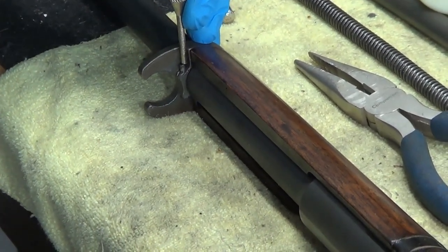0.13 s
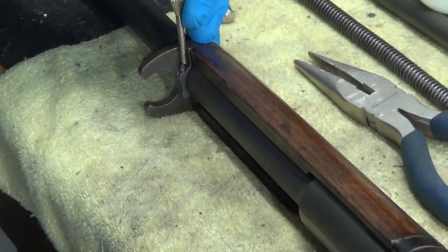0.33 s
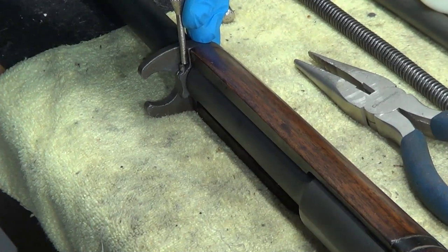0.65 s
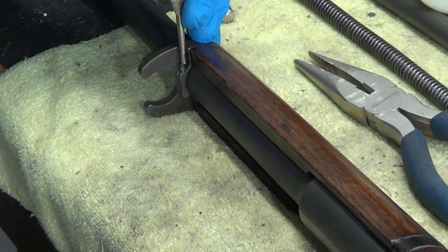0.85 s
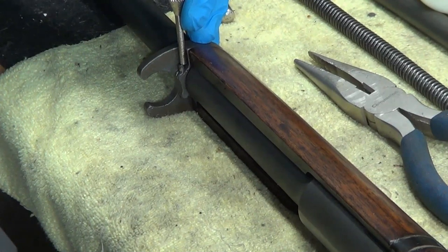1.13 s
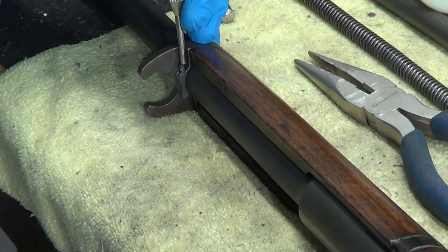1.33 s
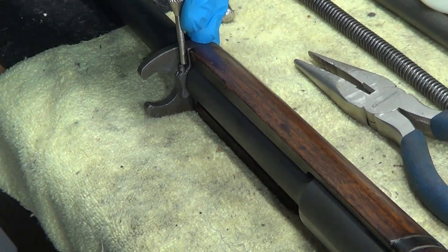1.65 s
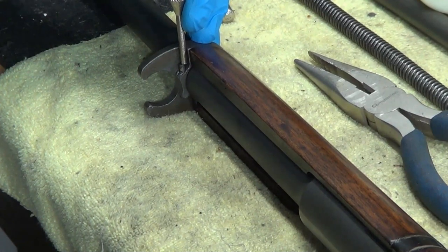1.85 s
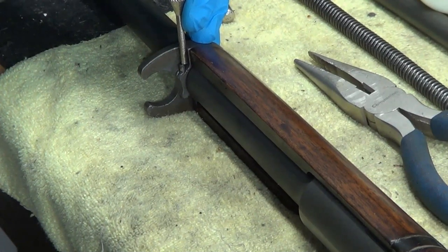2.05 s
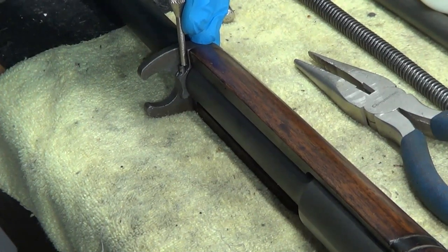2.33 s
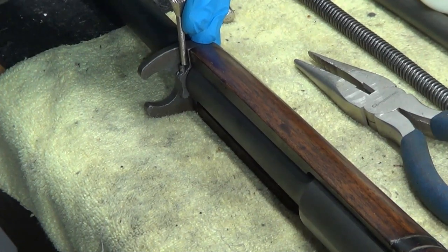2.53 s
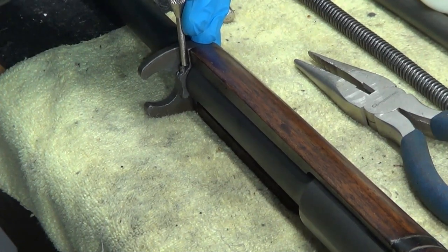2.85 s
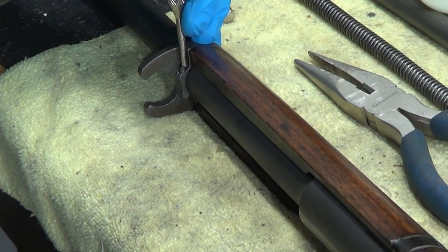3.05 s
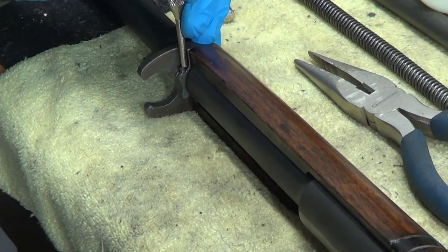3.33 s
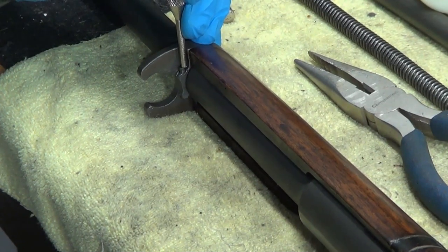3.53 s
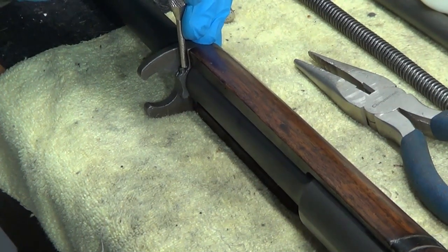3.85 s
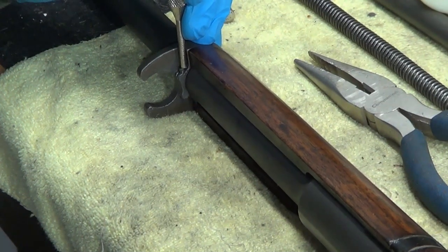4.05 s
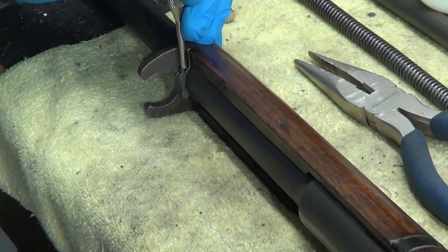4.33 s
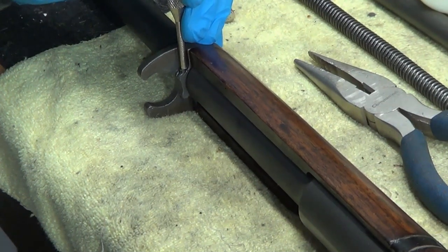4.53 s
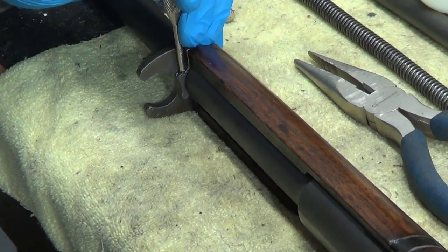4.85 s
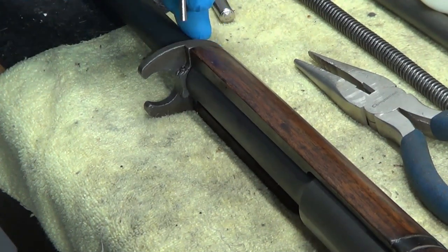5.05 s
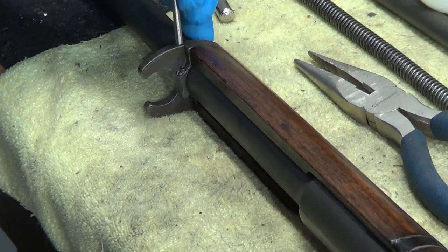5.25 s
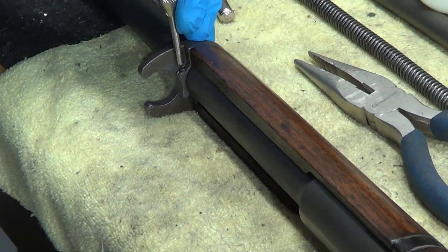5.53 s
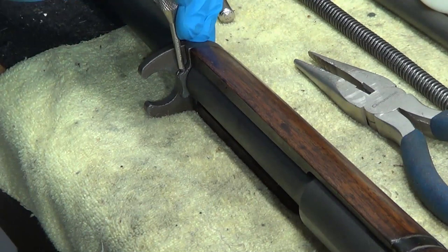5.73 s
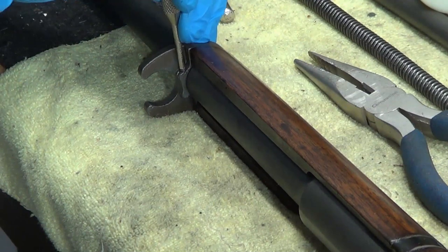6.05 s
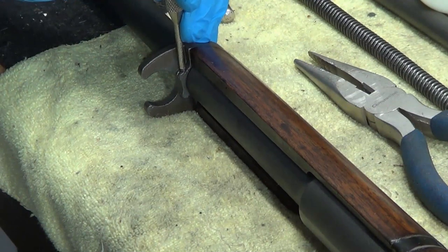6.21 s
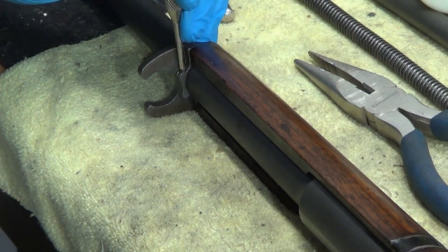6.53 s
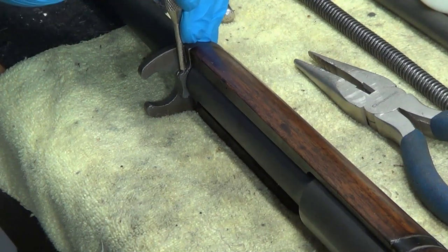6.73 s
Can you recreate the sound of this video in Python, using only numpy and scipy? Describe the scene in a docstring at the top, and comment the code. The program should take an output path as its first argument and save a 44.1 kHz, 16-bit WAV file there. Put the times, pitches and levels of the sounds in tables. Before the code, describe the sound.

Light metal hammer taps on a punch ring briefly against a gun on a workbench, with tiny scrapes between runs and a soft fan.

```python
"""A small hammer taps a steel pin punch into a wood-and-steel gun action lying on a workbench.
Each impact excites normal modes: heavily damped ones in hammer and punch make the crack, lightly damped
ones in action and bench ring on, and the small workshop reverberates. Between the runs of taps the punch
is re-seated, and friction makes short scrapes and squeaks. A fan hums throughout, a fast limiter
flattens each blow, and a thin electrical whine sits on top."""
import sys
import numpy as np
from scipy import signal
from scipy.fft import rfft, irfft
from scipy.io import wavfile
from scipy.ndimage import uniform_filter1d

SR = 44100
rng = np.random.default_rng(int(sys.argv[2]) if len(sys.argv) > 2 else 0)


def wrap_up_sound(samples):
    """Save the sound to the file named by the first command line argument, as 16-bit audio."""
    columns = np.atleast_2d(samples).T
    # keep every value between -1 and 1, then stretch to whole-number steps
    tamed = np.clip(columns, -1, 1)
    steps = np.round(tamed * 32767).astype(np.int16)
    wavfile.write(sys.argv[1], SR, steps)


N = 303408
TIME = np.arange(N) / SR
AGE = np.arange(2 ** 15) / SR  # seconds since a contact
HZ = np.fft.rfftfreq(len(AGE), 1 / SR)  # frequency axis of one contact's spectrum

# normal modes of bench, stock and action: frequency_hz, level_db, t60_s
WORK_MODES = [(156, -20.5, 0.33), (182.4, -16, 0.24), (430.4, -25, 0.68), (458, -32, 0.83),
              (742.6, -20.5, 0.6), (806.5, -23, 0.36), (1050, -26, 0.37), (1169.5, -15, 0.3),
              (1188, -13, 0.25), (1349, -21.5, 0.43), (1370, -18, 0.54), (1386, -17, 0.31),
              (1684, -18.5, 0.17), (1685, -23, 0.25), (1750, -18, 0.16), (1793, -20, 0.3),
              (1887, -16.5, 0.16), (1929, -17, 0.28), (1956, -25.5, 0.37), (1990, -22, 0.24),
              (2537, -18, 0.24), (2594, -16.5, 0.27), (2760, -33, 0.25), (2850, -25.5, 0.24),
              (2870, -23.5, 0.31), (3800, -29, 0.3), (3750, -16.5, 0.22), (3790, -20, 0.24),
              (7100, -25, 0.32), (8660, -12.5, 0.17)]


def from_db(db):
    """Amplitude ratio of a level: a factor of ten for every 20 dB."""
    return 10 ** (np.asarray(db) / 20)


def at_hz(points, hz):
    """Interpolation of (frequency, value) points on a logarithmic frequency axis."""
    point_hz, values = np.transpose(points)
    return np.interp(np.log(hz + 1), np.log(point_hz), values)


def decay(age, t60):
    """Exponential damping from age zero: the level falls 60 dB in t60 seconds."""
    return (age >= 0) * np.exp(-np.log(1000) * np.maximum(age, 0) / t60)


def add(out, start_s, sound):
    """Superposition: a sound adds linearly to the mix from its start time."""
    at = round(start_s * SR) + np.arange(len(sound))
    inside = (at >= 0) & (at < N)
    out[at[inside]] += sound[inside]


def shaped(white, shape_db):
    """Spectral shaping: the spectrum of white noise, filtered with unit mean power gain."""
    gain = from_db(shape_db)
    return rfft(white) * gain / np.sqrt(np.mean(gain ** 2))


def resonance(centre_hz, width_hz, height_db):
    """Frequency response of a resonance, as a bell curve in decibels."""
    return from_db(height_db * np.exp(-.5 * ((HZ - centre_hz) / width_hz) ** 2))


def struck(modes, phases, scatter_db=2.4, build_cycles=1.0, detune=0.0011):
    """Modal synthesis: damped sinusoids, newly weighted at each impact; low ones build up slowest."""
    hz, level_db, t60 = np.array(modes).T[:, :, None]
    strength, shift = rng.standard_normal((2, len(hz), 1))
    amplitude = np.sqrt(2) * from_db(level_db + scatter_db * strength)
    swing = np.sin(2 * np.pi * (hz * (1 + detune * shift) * AGE + phases))
    build = 1 - np.exp(-AGE * hz / build_cycles)
    return np.sum(amplitude * swing * build * decay(AGE, t60), axis=0)


def seating(levels_db):
    """Contact coupling: how the punch sits weights five broad frequency ranges."""
    # thud, body, clank, sheen and top ranges: centre_hz
    centres_hz = [500, 1500, 3100, 5400, 12000]
    return from_db(at_hz(list(zip(centres_hz, levels_db)), HZ))


def steel_response(ripple_db=1.5, spacing_hz=55):
    """Modal density: the steel's modes crowd into clusters and lie unevenly in between."""
    # clusters of close modes: centre_hz, width_hz, height_db
    clusters = [(2083, 44, 4), (2500, 140, 2.5), (3824, 100, 1), (4520, 180, 1)]
    grid_hz = np.arange(1000) * spacing_hz
    uneven = np.interp(HZ, grid_hz, rng.standard_normal(len(grid_hz))) * np.clip(HZ / 4000, 0, 1)
    return from_db(ripple_db * uneven) * np.prod([resonance(*cluster) for cluster in clusters], axis=0)


def pin_coupling(start_s, harder_db, sheen_db, punch_hz):
    """Coupling sets the timbre: a tight pin clanks, a free one lets bench and action ring."""
    # play of the pin as it is driven out: time_s, looseness (0 tight, 1 free)
    looseness = [(0.07, 0.17), (1.14, 0.052), (1.96, 0.5), (2.37, 0.31), (3.015, 0.012), (3.21, 0.47),
                 (3.84, 0.9), (4.06, 0.37), (4.46, 0.96), (4.83, 0.94), (6.43, 0.58), (6.65, 0)]
    loose = np.interp(start_s, *np.transpose(looseness))
    # harder blows shift the balance from the thud to the body and top
    thud_db = -0.5 + 2.5 * loose - 0.58 * harder_db
    body_db = -4 + 7 * loose + 0.17 * harder_db
    clank_db = 1.1 - 2.6 * loose
    top_db = -1 + 6.5 * np.log2(punch_hz / 8400) + 0.29 * harder_db
    return seating([thud_db, body_db, clank_db, sheen_db, top_db])


def crack(phases):
    """Impact transient: heavily damped modes die out within milliseconds."""
    # modes of hammer head and punch: frequency_hz, level_db, t60_s
    crack_modes = [(1253, 1.5, 0.0059), (1770, 1.5, 0.0032), (2790, -11.5, 0.019), (3270, -2.5, 0.0034),
                   (3745, -3, 0.013), (4600, -26, 0.0014), (6404, 4, 0.0054), (6590, -9, 0.011),
                   (9160, 0.5, 0.0078), (9100, -11, 0.0053), (12200, -17, 0.0035)]
    return from_db(4) * struck(crack_modes, phases[:len(crack_modes)])


def diffuse_spectrum(path, coherence=0.62):
    """Partial coherence: the room's own echo pattern blends with noise that is new at each blow."""
    # dense mix of high modes and room echoes: frequency_hz, relative_density_db
    density = [(30, -11), (110, -15.5), (200, 0), (300, -4), (550, -6.5), (900, -3.5), (1400, 2.5),
               (1950, 3.5), (2250, -2.5), (2650, 3), (3100, -1), (3800, -0.5), (5200, -6), (9500, -2),
               (11500, -9.5), (15500, -21.5)]
    noise = np.sqrt(coherence) * path + np.sqrt(1 - coherence) * rng.standard_normal(len(path))
    return shaped(noise, at_hz(density, HZ))


def clatter(spectrum, t60=0.049):
    """Early reflections: a short clatter of steel with two delayed echoes off bench and wall."""
    echoes = decay(AGE - 0.0056, 0.011) + 0.88 * decay(AGE - 0.0095, 0.018)
    return irfft(spectrum) * (from_db(-1.5) * decay(AGE, t60) + from_db(-2.5) * echoes)


def reverberation(spectrum, build_s=0.0053):
    """Diffuse field: dense ringing builds up, then each band decays at its own rate."""
    # reverberation time by band: centre_hz, t60_s
    bands = [(100, 0.35), (500, 0.35), (2000, 0.37), (8000, 0.28), (14000, 0.19)]
    centres_hz, t60s = np.transpose(bands)
    tail = 0
    for share, t60 in zip(np.eye(len(bands)), t60s):
        crossfade = at_hz(list(zip(centres_hz, share)), HZ)
        tail = tail + irfft(spectrum * crossfade) * decay(AGE, t60)
    return tail * (1 - np.exp(-AGE / build_s))


def work_ring(phases, colour):
    """Free vibration: the ringing of bench, stock and action fades smoothly to silence."""
    fade_out = (1 - (AGE / AGE[-1]) ** 2) ** 2
    return irfft(rfft(struck(WORK_MODES, phases)) * colour) * fade_out


def hammer_taps(room, phases, normal_force_db=-16):
    """Impulse excitation: the ringing grows with the force of a blow, while the crack barely changes."""
    # blows: start_s, force_db, sheen_db, punch_boost_db, punch_hz, clink_hz
    taps = [(-0.135, -11.5, 4, 2, 7800, 3550), (0.0713, -11.5, 1.5, -1, 7800, 4050),
            (1.14, -20, 8.5, -1, 8400, 4600), (1.7323, -23, 9, 1, 7300, 2730),
            (1.9587, -17.5, 9, -9.5, 8350, 4730), (2.169, -14, 0.5, 1.5, 7440, 3540),
            (2.3743, -13.5, 4.5, -0.5, 9000, 2560), (2.6072, -13, 3.5, -2.5, 8000, 2990),
            (2.8177, -12.5, 2.5, -1.5, 7900, 2830), (3.015, -12.5, 3.5, -2.5, 8700, 2540),
            (3.2077, -16, .5, 6, 8560, 3600), (3.421, -15.5, .5, 3, 8400, 2070),
            (3.638, -14.5, 2.6, 2.5, 7540, 4000), (3.841, -17, 0.5, 3.5, 8100, 4870),
            (4.0595, -15, 5, -3, 8900, 4130), (4.2656, -14, 4.5, -4.5, 8700, 2760),
            (4.4642, -14, 3.5, 1.3, 8650, 3320), (4.6645, -14, 3, 0.5, 7960, 1970),
            (4.826, -11, 0, -1, 9100, 3340), (6.4308, -24.5, 3.5, 10, 7340, 2280),
            (6.6514, -12, 4.5, 3, 9340, 1850), (6.8775, -11, -12, -5, 8200, 4650)]
    steel = steel_response()
    no_bass = signal.butter(4, 850, "high", fs=SR, output="sos")  # small steel parts radiate no bass
    out = np.zeros(N)
    for start_s, force_db, sheen_db, punch_boost_db, punch_hz, clink_hz in taps:
        harder_db = force_db - normal_force_db
        # the point of contact favours one range of the action's modes
        clink = resonance(clink_hz, width_hz=170, height_db=4.6)
        colour = pin_coupling(start_s, harder_db, sheen_db, punch_hz) * clink
        # the hand-held punch has a broad, damped resonance that moves with the grip
        punch = resonance(punch_hz, width_hz=750, height_db=5.5 + punch_boost_db)
        direct = crack(phases)
        early, late = (diffuse_spectrum(path) * steel * colour * punch for path in room)
        attack = signal.sosfilt(no_bass, direct + from_db(0.343 * harder_db) * clatter(early))
        ringing = from_db(-4) * reverberation(late) + from_db(-0.5) * work_ring(phases, colour)
        add(out, start_s, from_db(-15 + 0.017 * harder_db) * attack + from_db(force_db) * ringing)
    return out


def fan_and_air(air_db=-52.5):
    """Stationary noise: broadband air sound with the narrow resonances of a fan."""
    # workshop background: frequency_hz, relative_density_db
    air_spectrum = [(15, -57.5), (25, -14), (64, -16), (142, -7), (286, -6.5), (326, -8), (394, -2),
                    (462, -4.5), (673, -6.5), (769, -7), (2180, -15), (2850, -18.5), (3440, -19.5),
                    (8550, -23.5), (15000, -22.5)]
    # fan resonances: centre_hz, width_hz, level_db
    fan_resonances = [(677, 21, -62), (3490, 150, -63.5), (4740, 300, -67.5)]
    hz = np.fft.rfftfreq(N, 1 / SR)
    out = from_db(air_db) * irfft(shaped(rng.standard_normal(N), at_hz(air_spectrum, hz)))
    for centre_hz, width_hz, level_db in fan_resonances:
        peak_db = -20 * np.log10(1 + ((hz - centre_hz) / width_hz) ** 2)
        out += from_db(level_db) * irfft(shaped(rng.standard_normal(N), peak_db))
    return out


def friction(length_s, treble_db, ring_hz, ring_db, width_hz):
    """Sliding friction: the tip chatters, drives one mode and leaves a faint tail in the room."""
    # steel sliding on steel: frequency_hz, relative_density_db
    friction_spectrum = [(100, -19), (1000, -9.5), (1400, 0.5), (1750, 7.5), (2300, -1), (3000, 1),
                         (3750, 4.5), (4900, -1.5), (7000, 0), (8000, -4), (9200, 4.5), (11000, -8.5),
                         (15500, -20)]
    spectrum = shaped(rng.standard_normal(len(AGE)), at_hz(friction_spectrum, HZ))
    slide = decay(np.maximum(AGE - length_s, 0), t60=0.032)
    room_tail = from_db(-9) * decay(AGE, t60=0.31)
    chatter = irfft(spectrum * seating([0, 0, *treble_db])) * np.hypot(slide, room_tail)
    mode = signal.iirpeak(ring_hz, ring_hz / width_hz, fs=SR)
    return chatter + from_db(ring_db) * signal.lfilter(*mode, chatter)


def scrapes(phases, knock_db=-8.5):
    """Friction and impact: re-seating the punch scrapes the tip and knocks the bench's two lowest modes."""
    # contacts of the tip: start_s, length_s, level_db, brightness_db, ring_hz
    contacts = [(0.2612, 0.0058, -21, -8, 3810), (0.266, 0.0044, -32.5, -14, 1720),
                (1.399, 0.0079, -30.5, -3, 2030), (1.473, 0.0045, -33.5, -1.5, 2780),
                (1.4807, .004, -32.5, -7, 2450), (4.976, .002, -28.5, 7, 10500),
                (4.988, 0.032, -36.5, 10.5, 1660), (5.4565, 0.0059, -42, 10, 8800),
                (5.739, 0.011, -39.5, -13.5, 2160)]
    out = np.zeros(N)
    for start_s, length_s, level_db, bright_db, ring_hz in contacts:
        treble_db = [0.67 - 0.53 * bright_db, -4 + 0.22 * bright_db, bright_db]  # clank, sheen, top
        knock = from_db(knock_db) * struck(WORK_MODES[:2], phases[:2])
        scrape = friction(length_s, treble_db, ring_hz, ring_db=12, width_hz=65)
        add(out, start_s, from_db(level_db) * (scrape + knock))
    return out


def squeaks():
    """Friction drives a sharp resonance, so the punch squeaks in the hole with a clear pitch."""
    # slips of the punch: start_s, length_s, level_db, pitch_hz
    slips = [(5.466, 0.018, -55, 1410), (5.512, 0.0021, -49, 1480), (5.521, 0.014, -48.5, 1400),
             (5.558, .006, -55, 1600)]
    out = np.zeros(N)
    for start_s, length_s, level_db, pitch_hz in slips:
        squeak = friction(length_s, [-9, -9, -9], pitch_hz, ring_db=28.5, width_hz=30)
        add(out, start_s, from_db(level_db) * squeak)
    return out


def scene():
    """Superposition of the sources; the work stays put, so all blows take the same paths in the room."""
    background = fan_and_air()
    room = rng.standard_normal((2, len(AGE)))  # early and late echo patterns
    phases = rng.random((len(WORK_MODES), 1))
    return (background + hammer_taps(room, phases) + scrapes(phases) + squeaks())[None]


def limiter(x, threshold_db=-16.0, slope=0.94, release_db_per_s=169.0, attack_s=0.00056):
    """Dynamic range compression: gain drops within a millisecond of a peak and recovers steadily."""
    level_db = 10 * np.log10(np.abs(uniform_filter1d(x ** 2, size=44)) + 1e-12)
    over_db = np.maximum(level_db - threshold_db, 0) * slope
    release_db = release_db_per_s * TIME
    held_db = np.maximum.accumulate(over_db + release_db, axis=-1) - release_db
    pole = np.exp(-1 / (attack_s * SR))
    return x * from_db(-signal.lfilter([1 - pole], [1, -pole], held_db))


def whine():
    """Beating: two close electrical tones swell and fade at their difference frequency."""
    # electrical tones: pitch_hz, level_db
    tones = [(15734, -61), (15741, -65)]
    return sum(np.sqrt(2) * from_db(db) * np.sin(2 * np.pi * hz * TIME) for hz, db in tones)


def record(dry, ceiling=0.8, low_cut_hz=60, high_cut_hz=16300):
    """Limiting and soft saturation round the peaks; the whine joins and the whole is band-limited."""
    out = ceiling * np.tanh(limiter(dry) / ceiling) + whine()
    out = signal.sosfilt(signal.butter(1, low_cut_hz, "high", fs=SR, output="sos"), out)
    return signal.sosfilt(signal.ellip(10, .2, 80, high_cut_hz, fs=SR, output="sos"), out)


dry = scene()
out = record(dry)
wrap_up_sound(out)
```